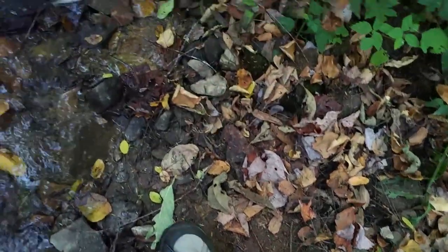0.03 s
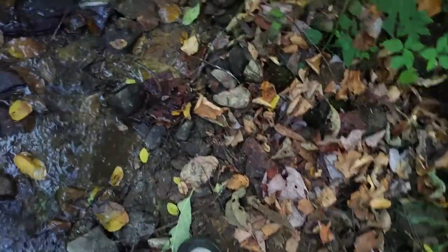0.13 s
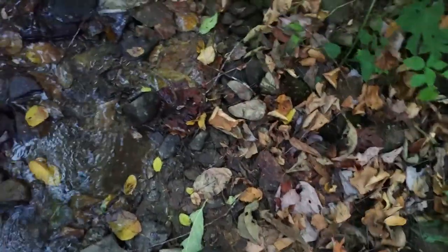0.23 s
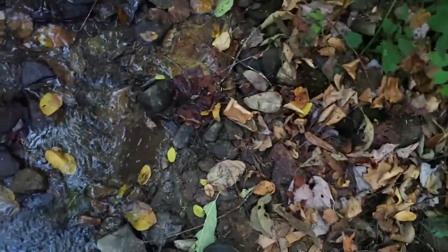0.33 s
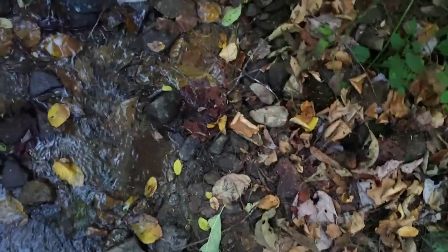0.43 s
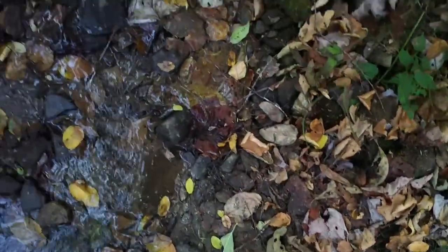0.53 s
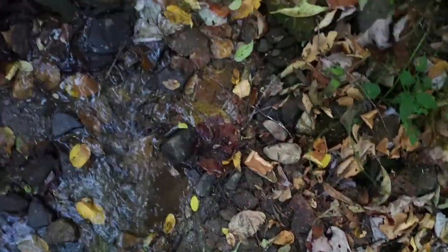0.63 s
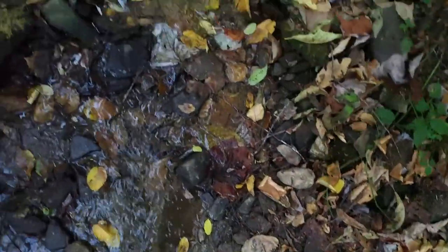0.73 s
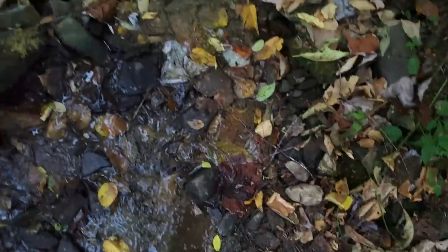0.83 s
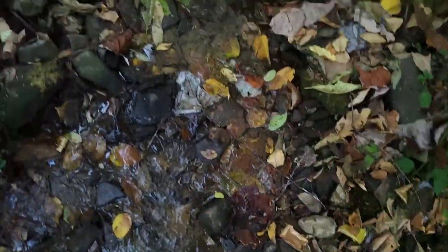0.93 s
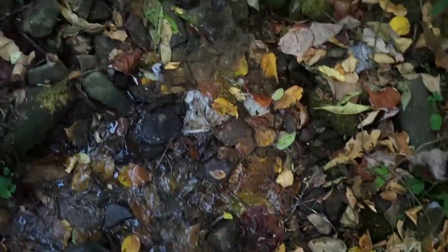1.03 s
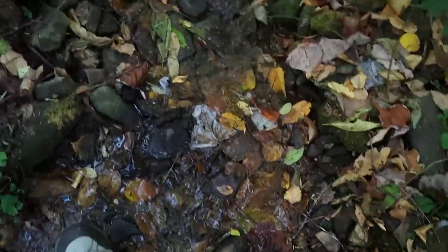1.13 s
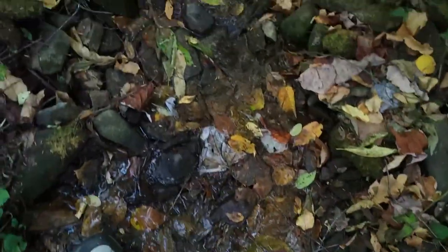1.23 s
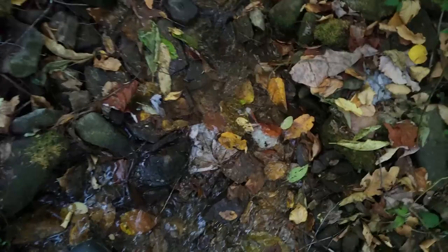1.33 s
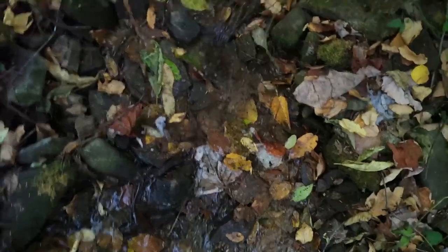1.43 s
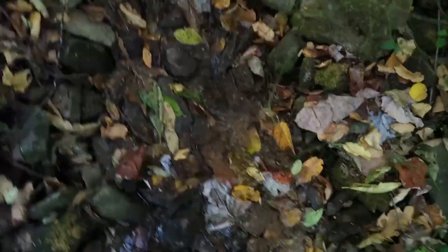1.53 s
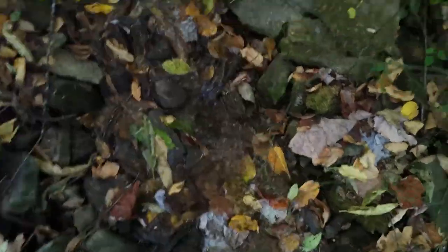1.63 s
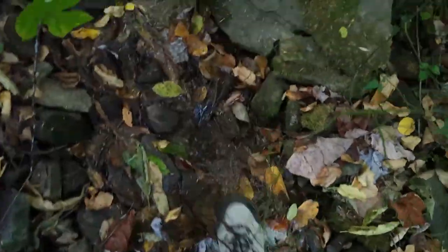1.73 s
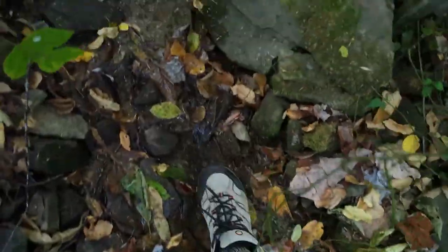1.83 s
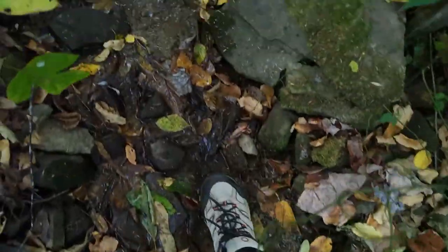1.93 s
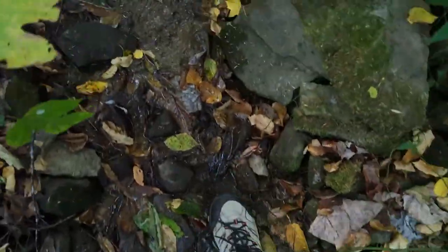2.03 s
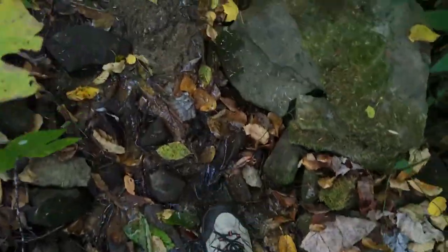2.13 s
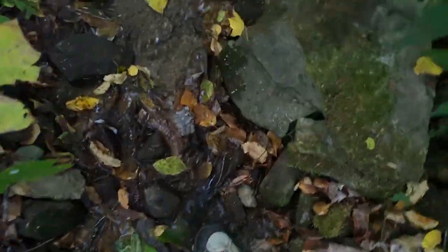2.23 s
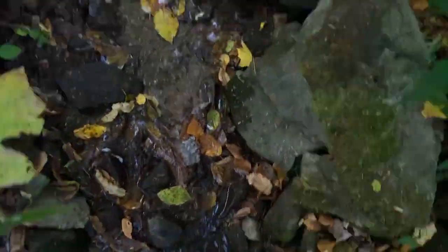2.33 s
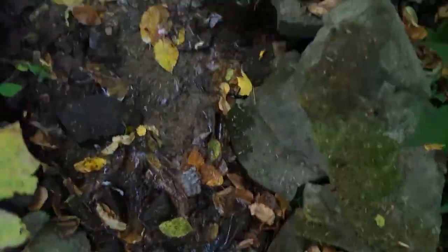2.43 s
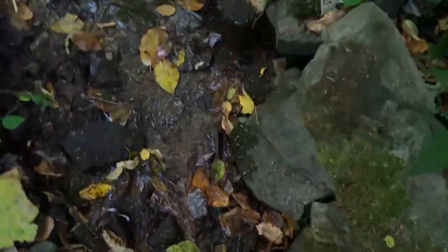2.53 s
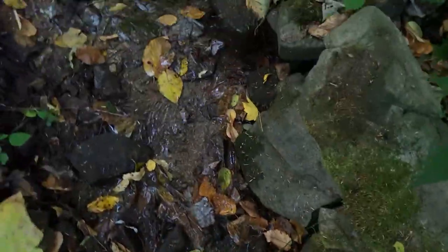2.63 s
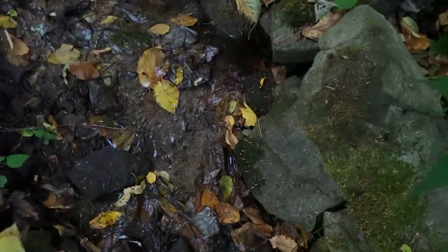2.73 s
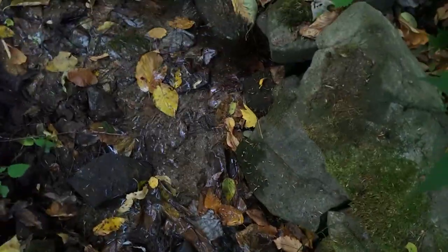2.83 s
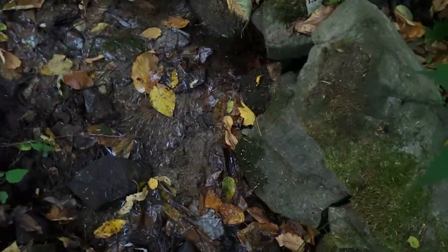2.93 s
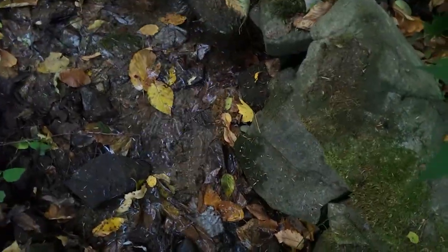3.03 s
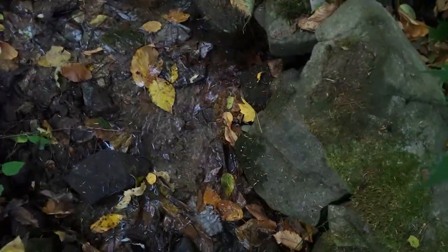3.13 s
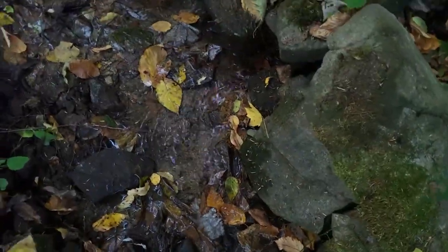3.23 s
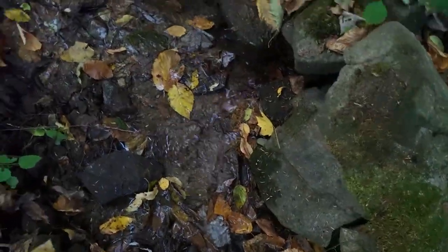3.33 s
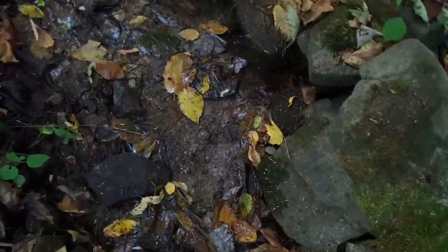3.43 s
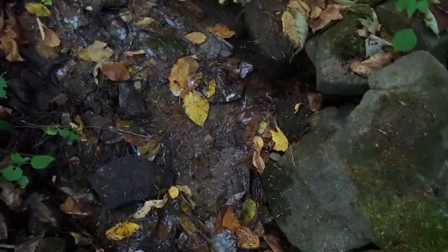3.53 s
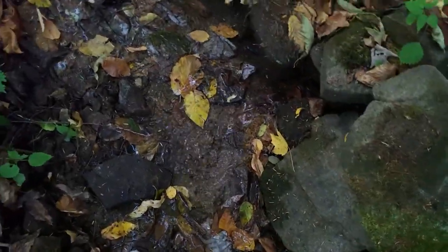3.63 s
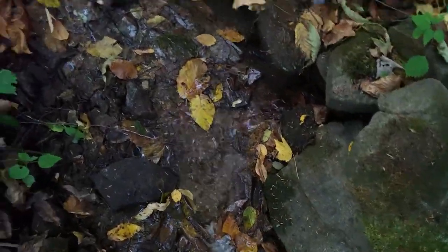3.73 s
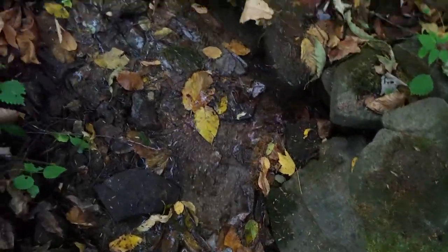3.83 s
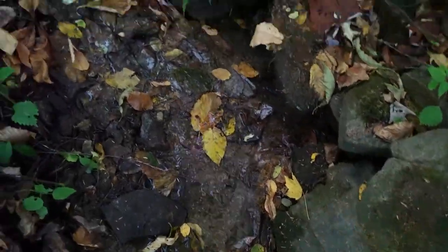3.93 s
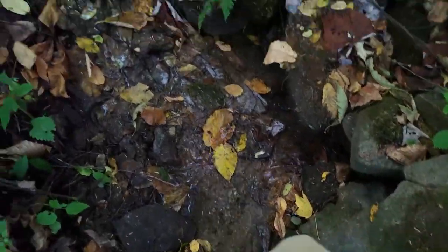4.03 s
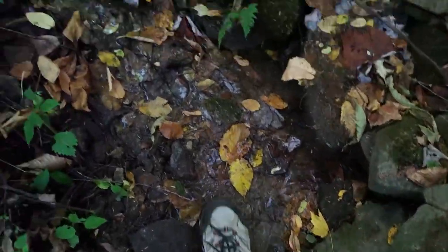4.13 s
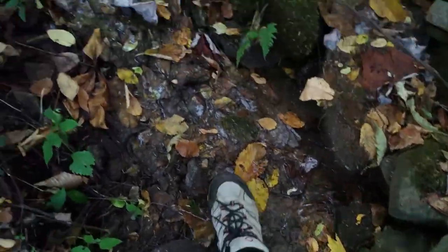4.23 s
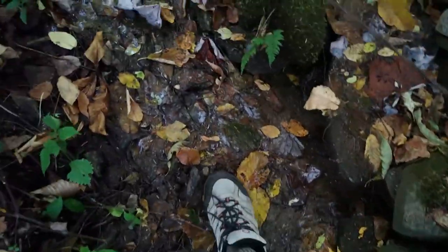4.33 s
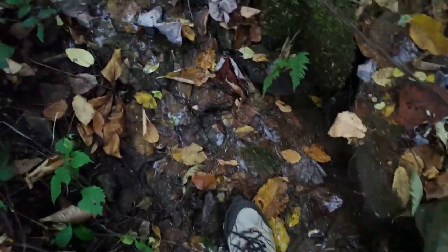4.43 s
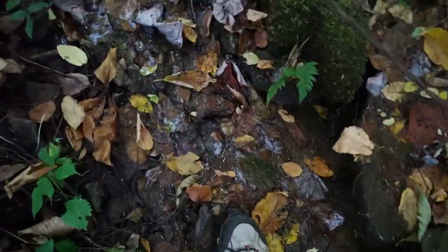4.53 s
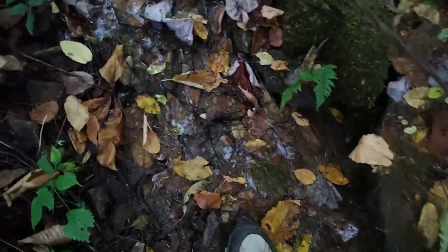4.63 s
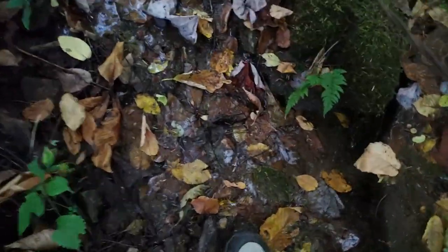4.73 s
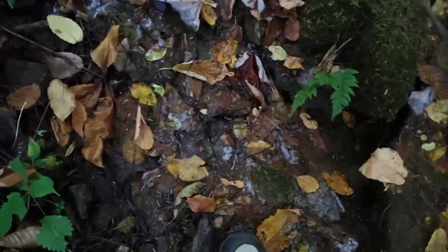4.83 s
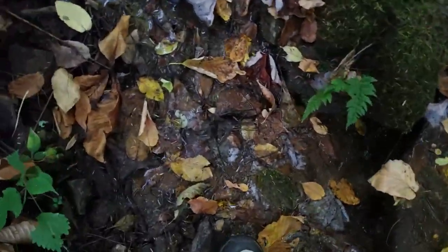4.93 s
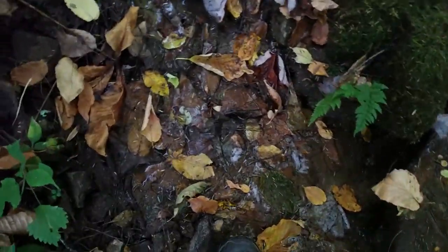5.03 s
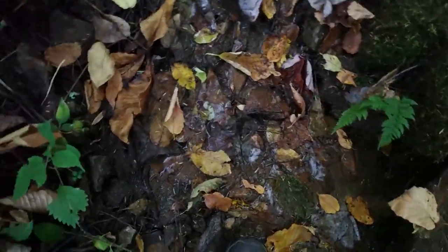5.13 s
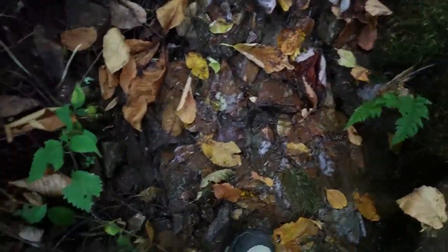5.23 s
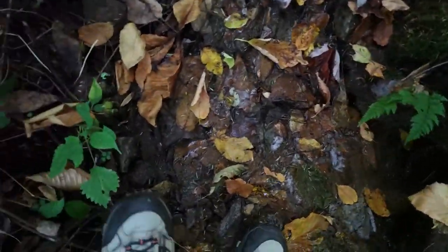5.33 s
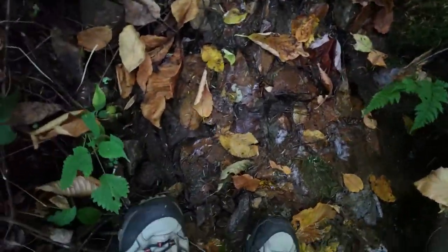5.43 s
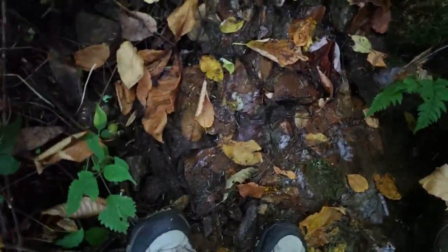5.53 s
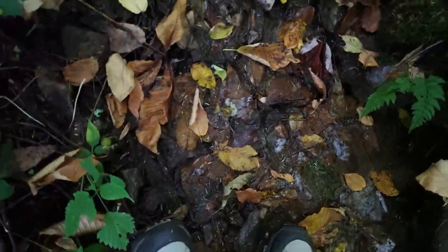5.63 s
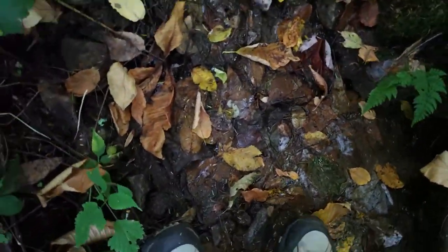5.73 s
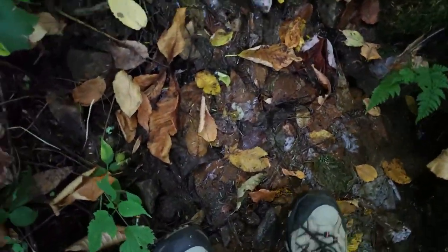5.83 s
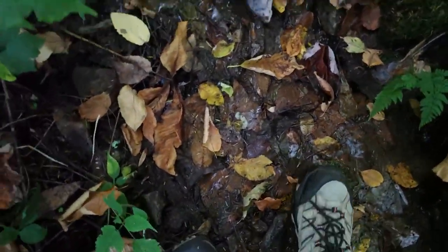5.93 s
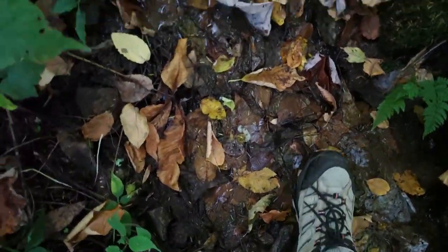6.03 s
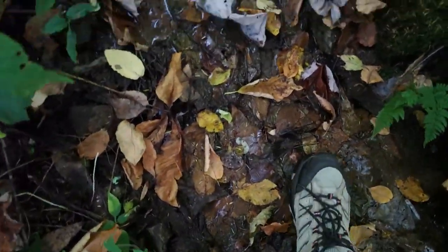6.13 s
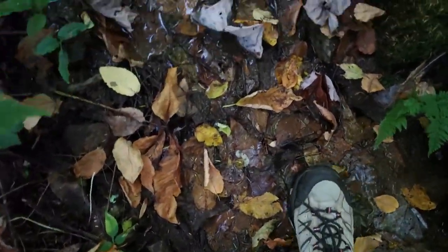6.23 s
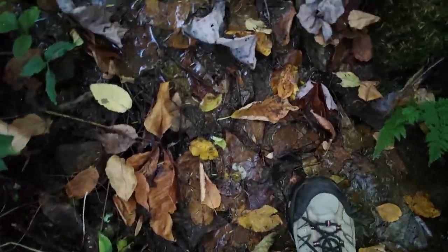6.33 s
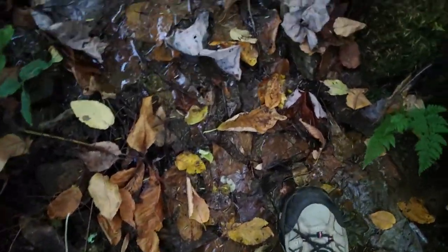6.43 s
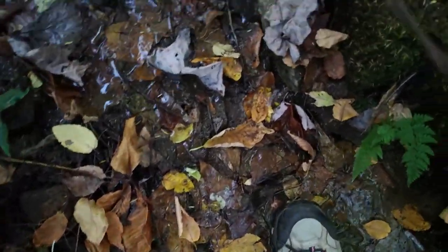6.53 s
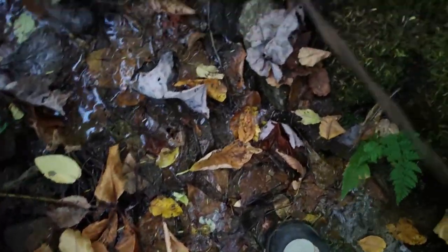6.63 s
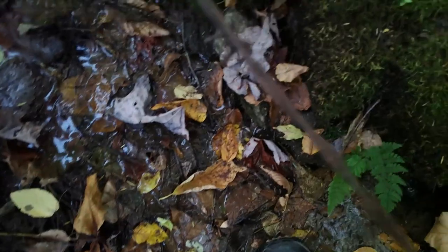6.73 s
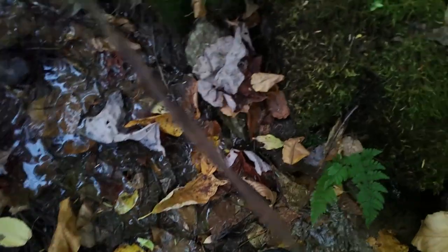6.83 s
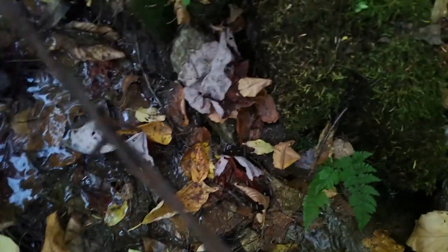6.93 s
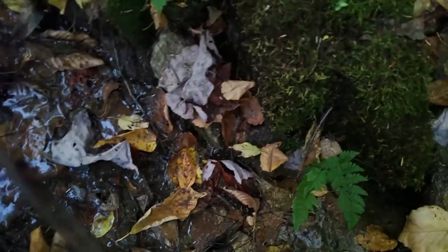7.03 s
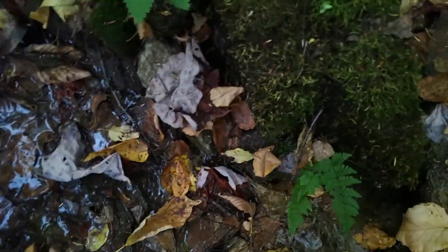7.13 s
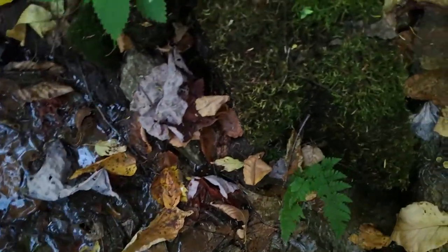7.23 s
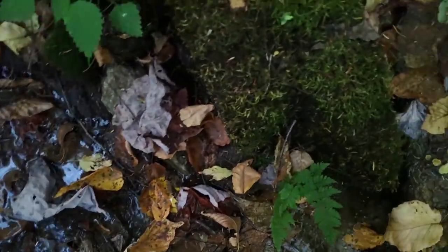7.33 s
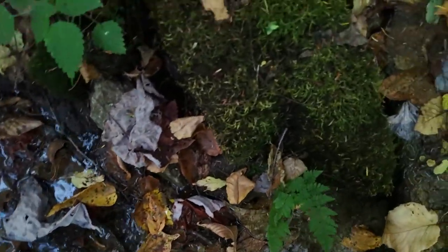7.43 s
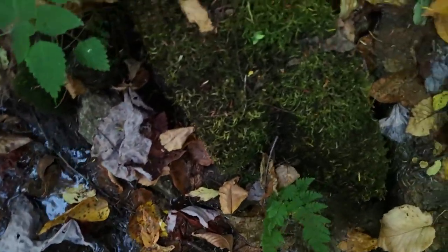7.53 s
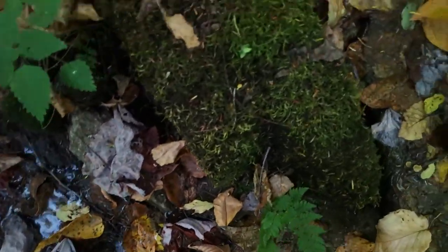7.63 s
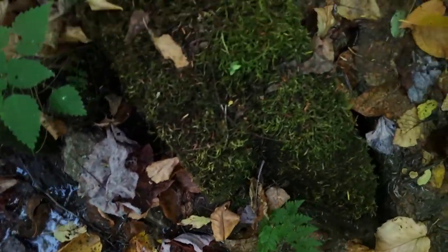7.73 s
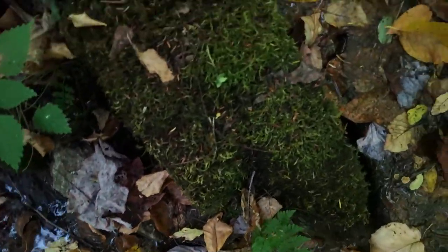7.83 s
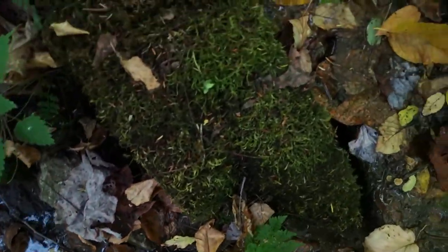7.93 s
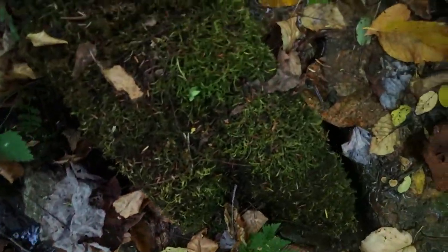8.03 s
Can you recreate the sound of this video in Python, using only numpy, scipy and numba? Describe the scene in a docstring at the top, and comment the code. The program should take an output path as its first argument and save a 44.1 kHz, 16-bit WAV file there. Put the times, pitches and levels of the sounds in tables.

```python
"""A shallow forest brook, with someone stepping slowly along its edge.
Wet leaves and grit underfoot are crowds of tiny damped rings over flickering noise, driven by each press.
Pebbles click and twigs snap as tight clusters of rings; soles and stones thud low; drops sing short notes.
The brook is steady filtered noise, nearby trickle shares the grains, narrow hisses come and go,
air rumbles softly over the microphone, and a faint low hum sets in late."""
import sys
import numpy as np
from scipy import signal
from scipy.fft import rfft, irfft, next_fast_len
from scipy.io import wavfile
from scipy.ndimage import uniform_filter1d
from numba import njit

SR = 44100
rng = np.random.default_rng(int(sys.argv[2]) if len(sys.argv) > 2 else 0)


def convert_level_to_amplitude(level_db):
    """Map a level in decibels to its linear amplitude factor."""
    exponent = np.asarray(level_db, float) / 20
    return 10 ** exponent


def to_wav(s):
    """Save 16-bit WAV."""
    ch = np.atleast_2d(s).T  # columns
    pcm = np.round(np.clip(ch, -1, 1) * 32767)  # PCM
    wavfile.write(sys.argv[1], SR, pcm.astype(np.int16))


N = 356769  # samples
T = np.arange(N) / SR  # s
TOP_HZ = 14300  # upper edge of the band


def colour(x, points):
    """Linear filtering: spectral gain through (frequency [Hz], gain [dB]) points on a log axis."""
    hz, db = np.transpose(points)
    size = next_fast_len(N)
    log_hz = np.log(np.arange(size // 2 + 1) * SR / size + 1)
    gain = convert_level_to_amplitude(np.interp(log_hz, np.log(hz), db))
    return irfft(rfft(x, size) * gain, size)[..., :N]


def band(x, lo_hz, hi_hz):
    """Band limitation: a steep Butterworth band-pass."""
    sos = signal.butter(3, [lo_hz, min(hi_hz, .45 * SR)], "band", fs=SR, output="sos")
    return signal.sosfilt(sos, x)


def high_pass(x, hz):
    """Low-frequency cut-off: a sixth-order Butterworth high-pass."""
    return signal.sosfilt(signal.butter(6, hz, "high", fs=SR, output="sos"), x)


def unit(x):
    """Normalisation: scale to rms 1 in the middle channel."""
    return x / np.sqrt(np.mean(x[0] ** 2))


def samples(s):
    """Sampling: times in s become sample numbers."""
    return (s * SR).astype(np.int64)


def walk(rate):
    """Slow random modulation: levels held for 1 / rate s, smoothed twice; spread near 1."""
    hold = int(SR / rate)
    steps = np.repeat(rng.standard_normal(N // hold + 1), hold)
    return 1.184 * uniform_filter1d(uniform_filter1d(steps, hold), hold)[:N]


@njit
def rings(length, start, hz, t60, glide, size, side, soft):
    """Damped resonance: rings swell over `soft` cycles, decay 60 dB in t60 s and glide by a share of hz.

    Row 0 is the middle, row 1 the left-right part."""
    out = np.zeros((2, length))
    for k in range(len(start)):
        # one complex factor a sample turns the phase and damps the ring
        p = np.exp(2j * np.pi * hz[k] / SR - np.log(1000.) / (t60[k] * SR))
        steps = int(t60[k] * SR)
        turn = np.exp(2j * np.pi * hz[k] * glide[k] / SR / (steps + 1))
        z, closed, opening = size[k] + 0j, 1., np.exp(-hz[k] / (soft * SR))
        for i in range(max(start[k], 0), min(start[k] + steps, length)):
            z *= p
            p *= turn
            closed *= opening
            out[0, i] += z.imag * (1 - closed)
            out[1, i] += side[k] * z.imag * (1 - closed)
    return out


def cluster(s, db, hz, rise_ms, fall_ms, spread, cycles, soft, count):
    """Fracture as a burst: splinters crowd each peak, scattered over `spread` octaves around hz."""
    u = rng.random((len(s), count, 4))
    # place runs from -1 (before the peak) to 1.6 (after it); one splinter sits on the peak
    place = 2.6 * u[..., 0] - 1
    place[:, 0] = 0
    rise, fall = (np.maximum(ms - 1.2, .1)[:, None] / 1000 for ms in (rise_ms, fall_ms))
    late = np.where(place < 0, rise, fall) * place
    pitch = np.minimum(hz[:, None] * 2 ** (spread * (u[..., 1] - .5)), .3 * SR)
    t60 = cycles / pitch
    # splinters that overlap share the level
    crowd = np.maximum(count * 0.17 * t60 / (rise + fall + 0.034 * t60), 1)
    sign = np.sign(u[..., 2] - .5)
    size = convert_level_to_amplitude(db[:, None] + 8.0 - 2.36 * np.abs(place)) / np.sqrt(crowd) * sign
    start = samples(s[:, None] + late - .0006)
    glide = np.full(t60.size, 0.18)
    side = 0.2 * (u[..., 3].ravel() - .5)
    return rings(N, start.ravel(), pitch.ravel(), t60.ravel(), glide, size.ravel(), side, soft)


# air over the microphone: (time [s], relative level [dB])
AIR_LEVEL = [(0.0, -51), (0.38, -51), (0.42, -33.5), (0.55, -51.5), (0.6, -28.5), (0.84, -34.5),
             (0.99, -47.5), (1.49, -41), (2.14, -41), (2.7, -51), (4.75, -47), (5.34, -44.5), (5.81, -52),
             (6.35, -45.5), (6.96, -48.5), (8.09, -50)]
# spectrum of that air: (frequency [Hz], relative level per Hz [dB])
AIR_COLOUR = [(15, -44), (25, -20), (38, -1.5), (59, -5), (104, -9.5), (172, -30.5), (250, -27.5),
              (320, -44), (550, -120)]


def rumble():
    """Turbulence noise: slow eddies of air, alike in both channels."""
    s, db = np.transpose(AIR_LEVEL)
    air = colour(convert_level_to_amplitude(1.6 * walk(14)) * rng.standard_normal(N), AIR_COLOUR)
    return convert_level_to_amplitude(np.interp(T, s, db)) * air / np.std(air)


def brook():
    """Broadband noise of many unresolved sources: the smooth distant hiss of water over stones."""
    level_db = -66.5
    return convert_level_to_amplitude(level_db) * unit(band(rng.standard_normal((2, N)), 1500, 14000))


# grain families: lowest Hz, highest Hz, grains per s, cycles per grain, size spread dB, wash against grains dB
SQUELCH = (147.5, 827.5, 401, 9.5, 4.5, -2.5)
CRUNCH = (748, 3317, 2098.5, 14, 5, -6.5)
RUSTLE = (3267, 5995, 1300, 29, 5.5, -5)
FIZZ = (5860, 15400, 1600, 64, 2.6, 6.6)
# colour of all the grains: (frequency [Hz], gain [dB])
GRAIN_COLOUR = [(88, -45), (150, -7), (340, -11), (495, -7), (714, -6), (1070, -3), (1300, -2.5),
                (1700, -0.5), (2180, -1.5), (2500, -1), (5400, -14.5), (7210, -16.5), (9270, -16),
                (13600, -15.5), (15000, -39)]


def grains(family):
    """Granular emission: many tiny cracks and bubbles, a few much larger, over a flickering wash."""
    lo_hz, hi_hz, rate, cycles, spread_db, wash_db = family
    u = rng.random((int(rate * N / SR), 6)).T
    hz = lo_hz * (hi_hz / lo_hz) ** u[1]
    size = convert_level_to_amplitude(-spread_db * np.log(u[2] + 0.028)) * hz
    t60 = cycles * (0.17 + 5.9 * u[3] ** 2) / hz
    side = 0.54 * (u[4] - .5)
    glide = 0.85 * (u[5] - .3)
    cracks = rings(N, (u[0] * N).astype(np.int64), hz, t60, glide, size, side, 0.31)
    # three pockets of the wash flicker, each alone
    edges = np.geomspace(lo_hz, hi_hz, num=4)
    noise = rng.standard_normal((2, N))
    wash = sum(convert_level_to_amplitude(5.0 * walk(18)) * band(noise, lo, hi) for lo, hi in zip(edges, edges[1:]))
    both = unit(band(cracks, lo_hz, hi_hz)) + convert_level_to_amplitude(wash_db) * unit(wash)
    # water and leaves give way in gushes
    return unit(colour(both * convert_level_to_amplitude(2.02 * walk(30)), GRAIN_COLOUR))


def fibres():
    """Brittle fracture: single fibres snap in a few cycles, wide in pitch, a few much larger."""
    rate, spread_db, against_crunch_db = 140, 4.2, -8.5  # rate per s
    u = rng.random((int(rate * N / SR), 3)).T
    hz = 1300 * 2.85 ** u[1]
    size = convert_level_to_amplitude(-spread_db * np.log(u[2] + 0.057))
    cracks = rings(N, (u[0] * N).astype(np.int64), hz, 4.0 / hz, 0 * hz, size, 0 * hz, 0.31)
    return convert_level_to_amplitude(against_crunch_db) * unit(cracks)


def crackle():
    """Random stress release: gain jumps and falls back fast as leaf fibres let go one after another."""
    rate, fade_s, depth = 110, 0.0034, 0.71  # rate per s
    jumps = (rng.random(N) < rate / SR) * rng.exponential(size=N)
    return 1 + depth * signal.lfilter([1], [1, -np.exp(-1 / (fade_s * SR))], jumps)


def families(db, bass_db, treble_db):
    """Band power: crunch, squelch, rustle and fizz for one level and colour."""
    rustle_db = 0.39 + 0.87 * treble_db
    fizz_db = -2.53 + treble_db
    return convert_level_to_amplitude(db + np.array([0 * db, bass_db, rustle_db, fizz_db])) ** 2


# water and settling leaves close by, between presses:
# (time [s], relative level [dB], bass against level [dB], treble against level [dB])
TRICKLE = [(0.0, -39, -8.5, -9), (0.54, -40, -16, -8.5), (1.06, -55, 5.5, 0.5), (1.3, -39, -5, -6.5),
           (1.56, -53, -7, -6), (1.8, -53.5, 0, -1), (2.3, -51, 2, -9), (2.5, -49, -1.5, -7),
           (2.63, -57.5, 3, 0), (3.1, -57.5, -4, -9), (3.5, -57.5, -1.5, -8), (4.1, -48, -4, -3),
           (4.4, -44, 0.5, 3), (5.35, -45, -7.5, -1), (5.87, -61, -3, -9), (6.18, -58, 3, 3),
           (6.45, -45, -7.5, -7), (6.84, -61, 5, 0.5), (7.09, -54.5, -2.5, -1.5), (7.58, -44, -2, -5),
           (8.09, -53, -11, 2)]
# a shoe presses, rolls or drags on leaves, grit and water:
# (peak time [s], relative level [dB], fade by 10 dB [ms], bass against level [dB], treble against level [dB])
PRESSES = [(0.21, -29, 102, -5, -3.5), (0.363, -30, 109, -19, -6.5), (0.436, -28, 31, -6.5, -5.5),
           (0.658, -44.5, 52, -7, -2), (0.897, -41.5, 69, -21, -5), (1.35, -22.5, 38, -4, -7.5),
           (1.461, -33.5, 76, -3, -3), (1.627, -37, 54, -19, -5.5), (1.84, -40, 82, -10, -22),
           (2.028, -28.5, 33, -5.5, 0.5), (2.084, -24, 42, -12, 4.5), (2.162, -27, 63, -11, -0.5),
           (2.236, -23, 8, 0, -2), (2.553, -48.5, 37, -16, -5), (2.762, -50.5, 83.5, 7, -4),
           (2.988, -54, 60, 2.5, -14), (3.15, -48.5, 23, -12, 7), (3.205, -41, 75, 0.5, -4),
           (3.363, -47, 82, -3.5, -0.5), (3.6, -47, 65, 2, 1), (3.72, -38, 143, -4.5, -3.5),
           (3.812, -39.5, 121, -21, -1.5), (3.96, -38, 83, -2.5, 1.5), (4.157, -37.5, 27, -4, 4),
           (4.501, -15.5, 27.5, -15, 0), (4.706, -21.5, 34, -13.5, 0), (4.922, -32.5, 28, -7, 0.5),
           (5.078, -26.5, 33, -12.5, 1), (5.105, -22.5, 9.5, -9, 5), (5.224, -30, 16, -5, -2.5),
           (5.455, -16, 8, -18, -12), (5.476, -19, 48, -6, -2), (5.627, -20.5, 22, -11, -7),
           (5.687, -30, 18, -19, -6), (5.746, -36, 56, -20, 1.5), (5.798, -28.5, 15.5, -11.5, -8),
           (5.894, -43.5, 75, -9.5, -4), (6.069, -45.5, 73, -9, -7), (6.241, -41.5, 65, -29, -7.5),
           (6.365, -31.5, 19, -17, 0.5), (6.67, -45, 100, -3, -5.5), (6.905, -50, 77, -1.5, -6),
           (7.137, -47, 63, -16, -4), (7.334, -42, 75, -14, 3), (7.43, -49, 90, 7, -20),
           (7.689, -26.5, 31, -11, 0), (7.938, -41.5, 83, -5, -6), (8.059, -27.5, 11, -16, -4)]


def weight():
    """Addition of powers: presses build up and fade over the trickle, for each grain family."""
    spray_db = -60.5  # fine fizz that never stops
    build_share = 0.53  # build-up time as a share of the fade
    s, *rest = np.transpose(TRICKLE)
    power = families(*(np.interp(T, s, column) for column in rest))
    power[3] += convert_level_to_amplitude(spray_db) ** 2
    for s, db, fade_ms, bass_db, treble_db in PRESSES:
        late = (T - s) * 1000 / fade_ms
        near = np.abs(late) < 4
        late = late[near]
        shape = 10 ** -np.where(late < 0, -late / build_share, late)
        power[:, near] += families(db, bass_db, treble_db)[:, None] * shape
    return np.sqrt(power)


def tread():
    """Load-driven emission: each grain family follows its own gain; the dry ones crackle together."""
    gains = weight()
    crunch, squelch, rustle, fizz = (
        gain * grains(family) for gain, family in zip(gains, (CRUNCH, SQUELCH, RUSTLE, FIZZ)))
    # wet leaves rasp in a narrow band
    rustle = colour(rustle, [(4060 - 640, 0), (4060, 1), (4060 + 640, 0)])
    dry = crackle()
    treble = (rustle + fizz) * dry * convert_level_to_amplitude(-5.5)
    return squelch + fibres() * gains[0] + crunch * dry ** 0.78 + treble


# clicks, snaps, gritty crunches and plops:
# (peak time [s], relative level [dB], ring frequency [Hz], fade [ms], relative treble level [dB])
CLICKS = [(0.02, -29, 2230, 1.9, -44), (0.104, -23, 1450, 4.3, -40), (0.178, -29, 1890, 3.8, -39),
          (0.251, -22.5, 2880, 5.4, -45), (0.268, -21.5, 1150, 2.2, -49), (0.29, -14.5, 1240, 2.1, -48),
          (0.314, -21, 1200, 4.9, -36), (0.347, -23, 1960, 3, -43), (0.369, -8.5, 1180, 1.04, -34),
          (0.428, -24, 1610, 5, -48), (0.445, -19, 1490, 3, -48), (0.462, -20, 1460, 2.8, -50),
          (0.494, -27, 1830, 1.1, -46), (0.562, -12, 1224, 2.46, -62), (0.581, -10, 2230, 2.3, -73),
          (0.704, -17.5, 2900, 1.66, -43), (0.828, -21.5, 1960, 1.35, -65), (0.992, -21.5, 4950, 1.5, -36),
          (1.081, -21.5, 1400, 3.1, -36), (1.34, -14, 1990, 7.6, -16.5), (1.458, -19.5, 950, 3, -38),
          (1.605, -18, 2250, 1.9, -44), (1.623, -18, 1190, 0.95, -42), (1.642, -15, 5200, 1.75, -43),
          (1.841, -25.5, 2540, 3.4, -62), (2.018, -17, 1930, 2, -22), (2.023, -20, 2900, 2.9, -18),
          (2.031, -22, 2010, 3, -29), (2.082, -14, 2800, 3, -23), (2.098, -15, 1550, 3.4, -35),
          (2.106, -38, 1130, 1.9, -12), (2.147, -21, 1400, 3.5, -28), (2.162, -14, 1900, 1.2, -38),
          (2.184, -11, 3630, 1.35, -36), (2.193, -14, 2600, 1.2, -40), (2.216, -21, 1780, 2.1, -15),
          (2.2342, 3.5, 1490, 1.0, -9.5), (2.26, -21, 2200, 1.6, -31), (2.507, -32, 1450, 1.2, -55),
          (2.721, -34, 1210, 2.5, -55), (2.774, -36, 2610, 3.2, -57), (2.986, -29.5, 2280, 3.6, -56),
          (3.037, -47, 2350, 1.5, -33.5), (3.142, -34, 4730, 2.3, -50), (3.2, -26, 960, 6.87, -43),
          (3.215, -38, 1130, 5, -60), (3.292, -23, 2300, 1.6, -46), (3.316, -26, 2080, 2, -34.5),
          (3.345, -24.5, 4240, 1.6, -42), (3.378, -29, 4570, 2.6, -38), (3.436, -33.5, 2630, 6.8, -76),
          (3.532, -29, 2440, 6, -44), (3.582, -28, 2450, 2.2, -49), (3.602, -25, 4670, 2.4, -44),
          (3.69, -45, 2000, 1.3, -32), (3.717, -35, 4050, 5.6, -52), (3.755, -15.5, 950, 2.3, -31),
          (3.762, -17.5, 970, 3.1, -50), (3.791, -32, 2330, 3.8, -43), (3.811, -47, 2400, 1.5, -32.5),
          (3.831, -33, 1800, 1.34, -35), (3.921, -25, 1750, 2.9, -33), (3.956, -17, 986, 4.1, -37),
          (3.964, -14, 915, 3.4, -42), (3.974, -14.5, 1130, 2.2, -43), (3.992, -22.5, 890, 2.4, -50),
          (4.055, -26, 1820, 4.3, -54), (4.113, -26, 1750, 4, -56), (4.151, -10.5, 1840, 1.3, -50),
          (4.251, -17, 1930, 3, -51), (4.28, -26.5, 2670, 1.5, -45), (4.443, -15, 2070, 4.1, -41),
          (4.449, -15, 2070, 4.2, -24.5), (4.456, -11, 1710, 3.4, -28), (4.4711, -1, 2250, 1.3, -16),
          (4.483, -10.5, 2610, 6.7, -12.5), (4.502, -12, 2090, 2.3, -22), (4.506, -0.5, 2270, 2.5, -10),
          (4.51, -2, 2600, 2, -6.5), (4.514, -3, 2770, 2, -9.5), (4.53, -17, 1510, 3.2, -30),
          (4.539, -15, 2480, 2.8, -42), (4.618, -27.5, 890, 9, -52), (4.717, -5, 2800, 2.3, -38),
          (4.76, -25, 3700, 1.5, -40), (4.995, -13.5, 2120, 0.97, -14.5), (5.136, -26, 3030, 2.1, -27),
          (5.217, -37, 1920, 0.97, -18.5), (5.226, -19.5, 2600, 5, -33), (5.32, -26.5, 2070, 6.9, -61),
          (5.4468, -4.5, 2140, 5.2, -22), (5.456, 2, 1350, 1.8, -19), (5.467, -4, 1710, 2.2, -18),
          (5.476, 1, 1296, 3.6, -36), (5.48, -2, 1560, 2.5, -32), (5.483, -4, 1800, 1.6, -26),
          (5.49, 5, 2020, 1.6, -33), (5.533, -22, 1430, 9.1, -44), (5.569, -25, 1500, 4.7, -42),
          (5.633, -15, 1300, 4, -36), (5.683, -10.5, 3470, 2.34, -34), (5.689, -14.5, 2090, 3.2, -46.5),
          (5.733, -20.5, 4530, 1.8, -30), (5.897, -22.5, 2660, 2.18, -53), (5.942, -23, 2170, 2.1, -54),
          (5.796, -36, 1980, 2.9, -46), (6.001, -36, 1670, 4.1, -60), (6.056, -30, 2100, 2.8, -60),
          (6.065, -30.5, 2250, 9.4, -60), (6.126, -32, 3720, 4, -43), (6.221, -27, 2120, 4.3, -55),
          (6.238, -18, 2470, 2.7, -55), (6.244, -22, 1970, 5, -60), (6.266, -21, 1930, 1.24, -21.5),
          (6.338, -33, 4470, 1.2, -22.5), (6.359, -24, 2600, 1.4, -26), (6.363, -20.5, 2700, 2.65, -31.5),
          (6.372, -16, 2420, 1.9, -38), (6.475, -29, 1910, 3, -44), (6.534, -30, 2370, 5.5, -38.5),
          (6.612, -39, 1070, 4.4, -30.5), (6.649, -30, 2470, 1.5, -55), (6.67, -23, 2600, 0.98, -52),
          (6.713, -32, 5030, 1.3, -28), (6.76, -43, 1390, 2, -34.5), (6.805, -36, 2400, 2.9, -44),
          (6.868, -37.5, 2330, 11, -42.5), (6.898, -24.5, 2280, 1.37, -29.5),
          (6.944, -27.5, 2120, 1.8, -42), (7.11, -27.5, 2370, 3, -45), (7.146, -31, 1400, 5.1, -62),
          (7.17, -28.5, 2200, 3.2, -57), (7.268, -32, 6000, 2.3, -34), (7.29, -38, 2520, 1.74, -28.5),
          (7.324, -30, 2350, 2, -30), (7.339, -22, 2260, 1.8, -31.5), (7.369, -30, 3620, 2, -38),
          (7.448, -29.5, 1860, 4, -40.5), (7.502, -21, 1400, 1.7, -41), (7.686, -2.5, 6360, 2.05, -10),
          (7.594, -25, 3450, 2, -50), (7.615, -28, 3080, 3.5, -51), (7.929, -29, 2000, 1.5, -53),
          (7.982, -20, 2820, 1.5, -48), (8.05, -6, 1000, 1.33, -41), (8.062, -19.5, 3040, 2.6, -35)]


def clicks():
    """Impact excitation: each click snaps, rings near one note, throws grit and spits in the treble."""
    s, db, hz, fall_ms, treble_db = np.transpose(CLICKS)
    rise_ms = 1.5 + 0.2 * fall_ms
    # wet clicks fade slowly: they ring longer, snap less and carry less grit
    wet = np.clip(fall_ms / 4.3, 0, 1)
    note = cluster(s, db - 8.0 + 5.1 * wet, hz, rise_ms, fall_ms, spread=0.15 + 0.067 * wet[:, None],
                   cycles=15.0 + 24 * wet[:, None], soft=0.37, count=6)
    grit = cluster(s, db - 6.0 - 5.0 * wet, np.sqrt(hz * 2000), rise_ms, fall_ms, spread=1.26,
                   cycles=13.5, soft=0.18, count=14)
    spit = cluster(s, treble_db - 4.5, 8800 + 0 * s, rise_ms, fall_ms, spread=1.03,
                   cycles=60, soft=0.31, count=24)
    snap = rings(N, samples(s - .0005), np.sqrt(hz * 1800), 0.0022 + 0 * s, 0 * s,
                 convert_level_to_amplitude(db + 5.5 - 19.5 * wet), 0 * s, 0.25)
    return note + grit + spit + snap


def ticks():
    """Random point events: stray droplets and fibres tick in the treble, a few larger."""
    rate, spread_db, fade_ms = 18.5, 2.5, 3.5  # rate per s
    u = rng.random((int(rate * N / SR), 3)).T
    one = np.ones(u.shape[1])
    db = -50 - spread_db * np.log(u[1] + 0.055)
    hz = 8598 * 2 ** (0.63 * (u[2] - .5))
    return cluster(u[0] * N / SR, db, hz, 1.2 * one, fade_ms * one, spread=0.98, cycles=35, soft=1.0, count=8)


# soft thuds of the sole and of settling stones:
# (peak time [s], relative level [dB], central ring frequency [Hz])
THUDS = [(0.181, -33, 278), (0.44, -34, 260), (0.58, -36, 78.6), (0.737, -33, 81), (1.083, -31.5, 515),
         (1.352, -35, 443), (1.464, -27.5, 450), (1.627, -23.5, 105), (1.824, -34, 83), (2.065, -28, 386),
         (2.237, -25, 320), (3.58, -34, 320), (3.754, -37, 390), (4.506, -24.5, 454), (4.71, -41, 172),
         (5.095, -20.5, 276), (5.474, -24, 84), (5.636, -30, 245), (5.77, -36, 223), (6.281, -43, 91),
         (7.415, -29.5, 168), (7.459, -34, 199), (7.678, -38, 252)]


def thuds():
    """Low-frequency resonance: soft damped rings, each a pair loosely matched in time and pitch."""
    s, db, hz = np.repeat(np.transpose(THUDS), 2, axis=1)
    u = rng.random((len(s), 2)).T
    start = samples(s - (0.66 + u[0]) / hz)
    pitch = hz * 2 ** (0.34 * (u[1] - .5))
    return rings(N, start, pitch, 0.011 + 8.6 / hz, -.1 + 0 * s, convert_level_to_amplitude(db + 4.0), 0 * s, 0.1)


# water squeezed through leaves: (start [s], end [s], relative level [dB], centre frequency [Hz])
HISSES = [(2.29, 2.557, -50.5, 3600), (3.182, 3.223, -40, 4300), (3.616, 4, -47, 4500),
          (4.885, 4.965, -24, 1580), (6.59, 7.4, -55, 757), (7.403, 8.04, -44, 2270),
          (7.55, 8.035, -50, 3670)]


def hisses():
    """Narrow-band flow noise: it swells in, flickers and stops."""
    edge_s, half_width = 0.05, 0.09  # half width as a share of the centre
    noise = rng.standard_normal((2, N)) * convert_level_to_amplitude(5.2 * walk(60))
    out = np.zeros((2, N))
    for start, end, db, hz in HISSES:
        edge = min(edge_s, (end - start) / 2.2)
        gate = np.clip(np.minimum(T - start, end - T) / edge, 0, 1)
        out += convert_level_to_amplitude(db) * gate * unit(band(noise, hz * (1 - half_width), hz * (1 + half_width)))
    return out


# drops and bubbles that sing one short note:
# (start [s], relative level [dB], starting pitch [Hz], relative length [ms])
DROPS = [(2.296, -31, 2360, 7.4), (2.548, -32, 2540, 3.6), (3.217, -35, 2100, 4.6), (3.542, -31, 1940, 5.7),
         (3.774, -28.5, 4580, 3), (3.999, -21, 1210, 4.7), (4.08, -28, 2490, 3.8), (4.16, -16.5, 1790, 4.3),
         (4.318, -30, 2150, 4), (4.859, -23, 1530, 4.7), (5.136, -19.5, 3100, 4.6), (6.22, -33, 4570, 2.5),
         (6.241, -32, 4640, 4.3), (6.283, -30, 3220, 5.2), (6.572, -29, 3440, 2.5),
         (6.918, -31.5, 1960, 6.5), (7.014, -37, 4850, 3.6), (7.051, -30.5, 1940, 4.3),
         (7.239, -30, 2610, 3.9), (7.287, -29, 2530, 3.7), (7.782, -25, 1670, 8.5), (8.016, -30, 2290, 3.2)]


def drops():
    """Bubble resonance: trapped air swells for a few cycles, rises a little in pitch and dies away."""
    s, db, hz, ms = np.transpose(DROPS)
    t60 = 7.3 * ms / 1000
    return rings(N, samples(s), hz, t60, 0.039 + 0 * s, convert_level_to_amplitude(db + 2.5), 0 * s, 3.6)


def hum():
    """Frequency and amplitude modulation: a faint low tone fades in and wavers."""
    start_s, hz, db, waver_db = 7, 122, -54, 2
    phase = 2 * np.pi * np.cumsum(hz * (1 + 0.0104 * walk(1.1))) / SR
    fade_in = np.clip((T - start_s) / 0.074, 0, 1)
    return convert_level_to_amplitude(db + waver_db * walk(6)) * fade_in * np.sqrt(2) * np.sin(phase)


def width(side):
    """Stereo width: only the treble differs between left and right, in five bands that flicker at random."""
    side_hz, side_db = 5370, 4.0
    edges = np.geomspace(side_hz, TOP_HZ, num=6)
    bands = (band(side, lo, hi) * np.clip(0.16 + 1.2 * walk(6.7), 0, 1) for lo, hi in zip(edges, edges[1:]))
    return convert_level_to_amplitude(side_db) * high_pass(sum(bands), side_hz)


def scene():
    """Superposition: all layers add, and middle and left-right part become two channels."""
    mid, side = brook() + tread() + clicks() + ticks() + thuds() + hisses() + drops()
    side = width(side)
    return rumble() + hum() + mid + np.array([side, -side])


def low_pass(x):
    """Removes everything above the highest recorded frequency."""
    return signal.sosfilt(signal.butter(12, 15610, fs=SR, output="sos"), x)


# response of the microphone in its housing: (frequency [Hz], gain [dB])
MICROPHONE = [(3000, -2), (4700, -0.5), (5900, 0), (7300, 2), (9500, 1.5), (12000, -5.5)]


def record(dry):
    """Band limitation and peak limiting: peaks are held at full scale, both channels together."""
    x = colour(high_pass(dry, 43), MICROPHONE)
    x = x / np.maximum(np.abs(x).max(axis=0), 1)
    x = signal.sosfilt(signal.ellip(6, .3, 40, TOP_HZ, fs=SR, output="sos"), x)
    return low_pass(x)


dry = scene()
out = record(dry)
to_wav(out)
```